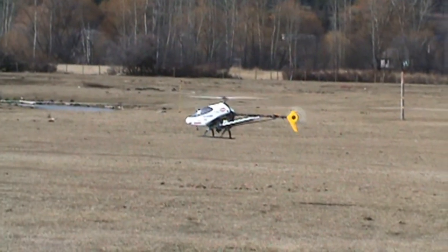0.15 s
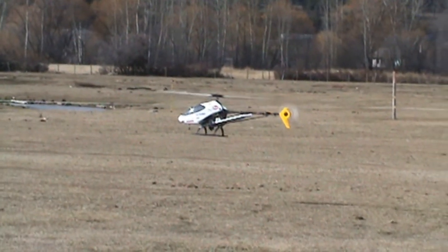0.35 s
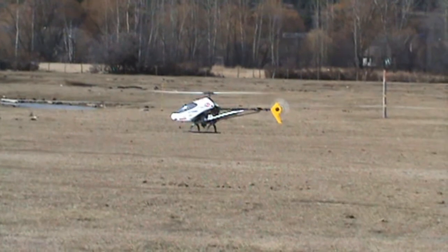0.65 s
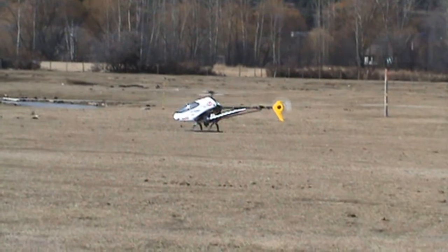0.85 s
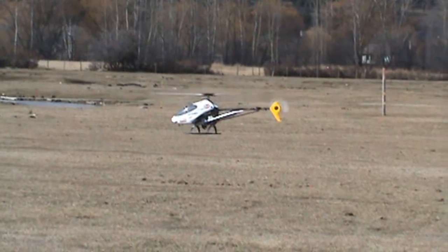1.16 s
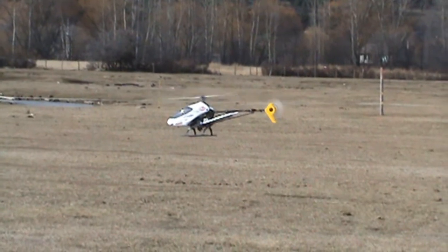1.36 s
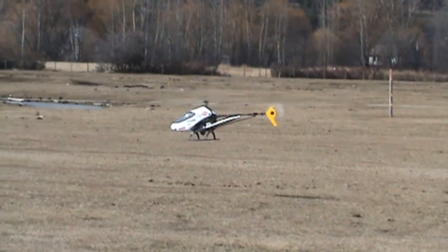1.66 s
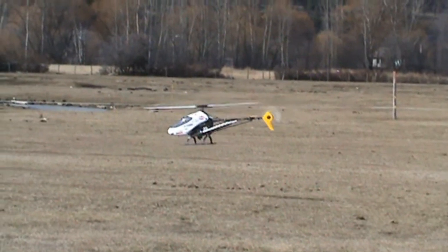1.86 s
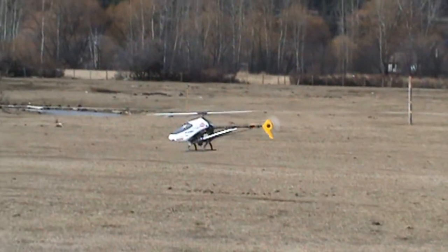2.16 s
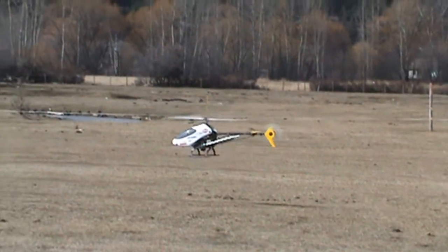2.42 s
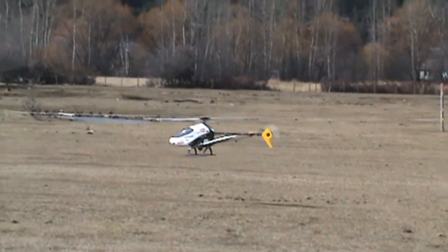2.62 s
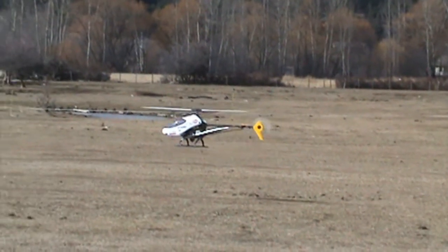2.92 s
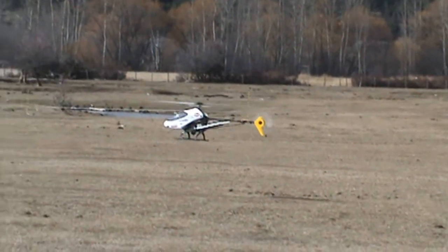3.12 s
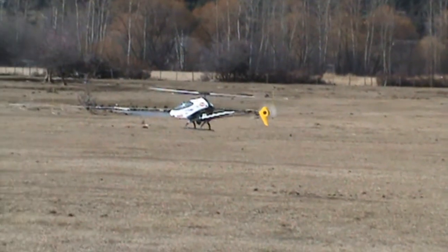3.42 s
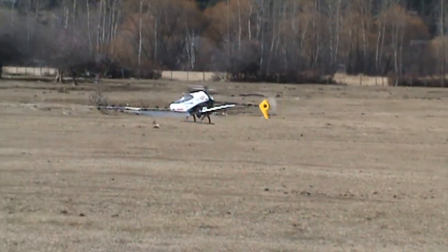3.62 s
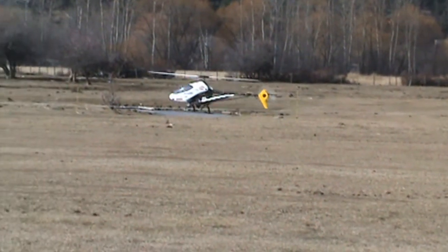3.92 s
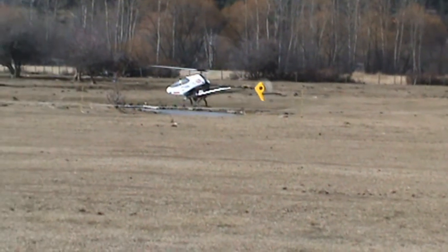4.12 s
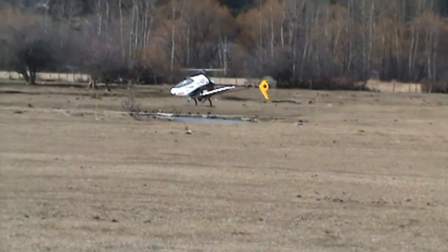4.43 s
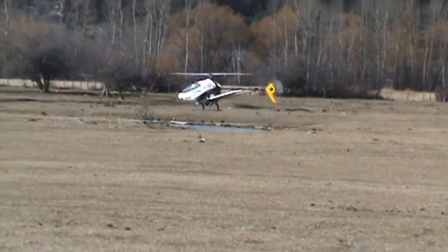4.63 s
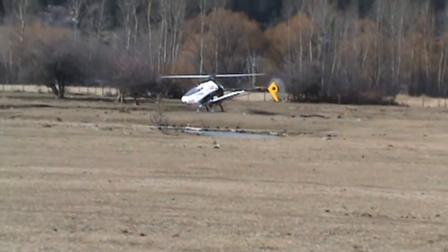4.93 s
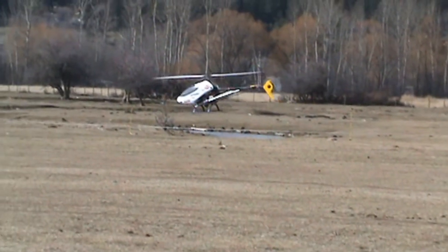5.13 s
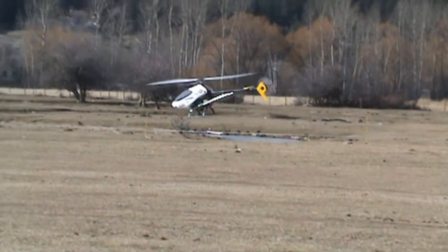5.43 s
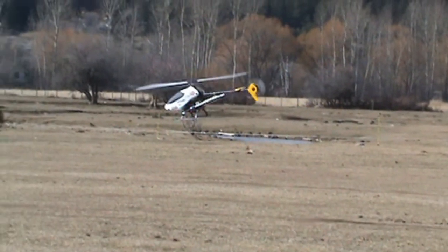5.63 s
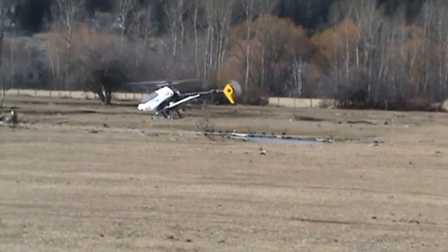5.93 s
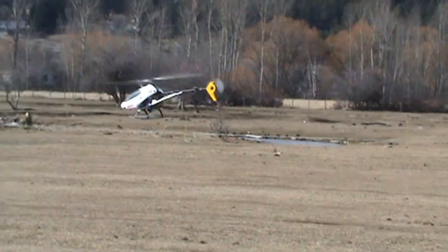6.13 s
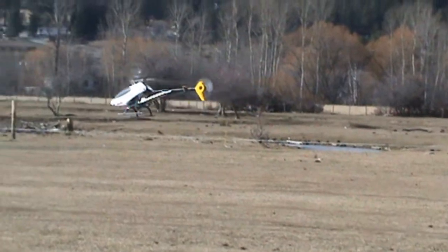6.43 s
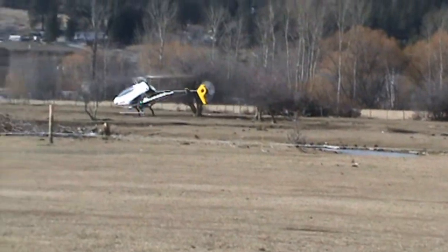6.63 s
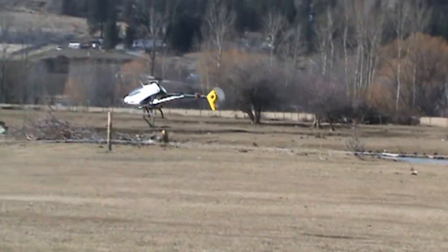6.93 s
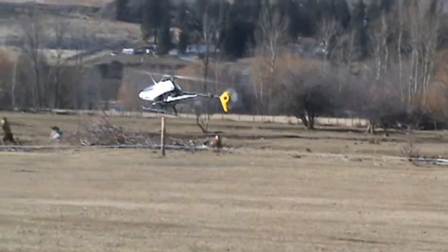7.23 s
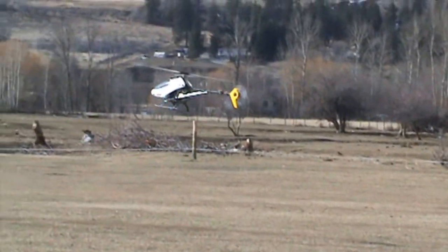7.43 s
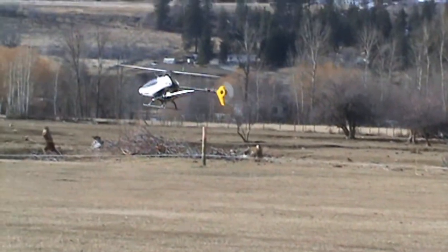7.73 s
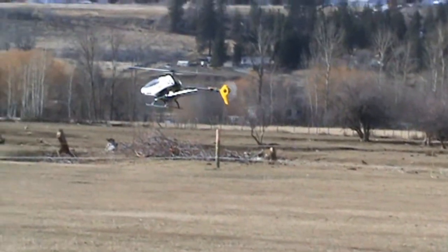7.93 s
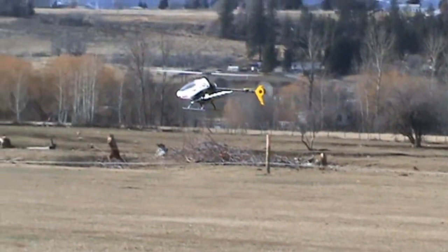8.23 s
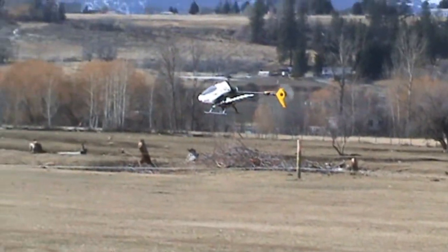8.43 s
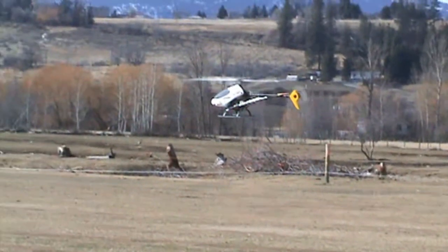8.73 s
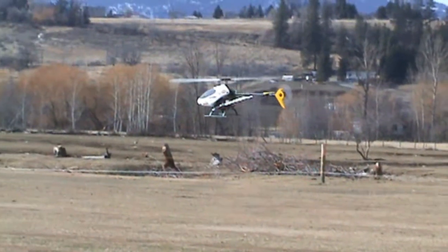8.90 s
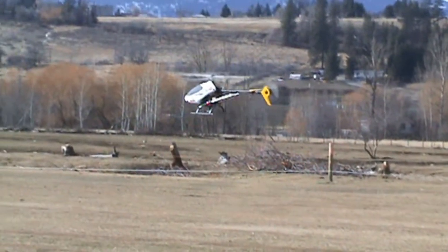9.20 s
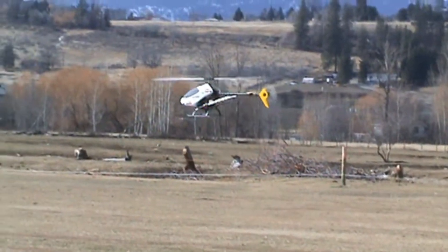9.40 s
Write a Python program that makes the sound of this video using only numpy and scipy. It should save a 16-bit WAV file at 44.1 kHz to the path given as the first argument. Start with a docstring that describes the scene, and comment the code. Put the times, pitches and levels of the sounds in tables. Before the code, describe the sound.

A model helicopter with a tiny two-stroke engine hovers about ten metres away over a grass field. Its dense, nasal buzz near 195 hertz never stops, with ringing upper harmonics, raspy exhaust noise and fine hiss. Short stumbles roughen it; pitch rises slightly midway, then settles. Blade swish and flutters stay faint beneath. A distant vehicle drones low in the middle, and light wind rumbles on the stereo microphones, the engine leaning right.

```python
"""An open field: a model helicopter with a small two-stroke engine hovers low, climbs a little and drifts sideways.
Each firing is a buzzing pulse of harmonics plus a burst of noise ringing in the muffler; at times the engine stumbles.
The harmonics slide through the muffler's resonances, and the echo off the grass comes later with height.
Sine tones and chopped noise make the rotor, with short flutters as the blades cut their own wake.
Low sine orders make a far vehicle's drone; a light wind rumbles as low noise, separate on each of two microphones."""
import sys
import numpy as np
from scipy import signal
from scipy.fft import rfft, irfft, next_fast_len
from scipy.io import wavfile
from scipy.ndimage import map_coordinates

SR = 44100
rng = np.random.default_rng(int(sys.argv[2]) if len(sys.argv) > 2 else 0)


def digitize_waveform(pressure):
    """Quantize a signal to 16-bit integers and store it at the path in sys.argv[1].

    Rows of a 2-D input are taken as channels; values are limited to [-1, 1].
    """
    field = np.atleast_2d(pressure).T
    bounded = np.clip(field, -1, 1)
    quanta = np.round(bounded * 32767).astype(np.int16)
    wavfile.write(sys.argv[1], SR, quanta)


N = 421596
TIME = np.arange(N) / SR


def from_db(db):
    """Decibels to gain."""
    return 10 ** (np.asarray(db) / 20)


def rms_one(x):
    """Scale to unit power."""
    return x / np.sqrt(np.mean(x ** 2) + 1e-20)


def in_time(rows, t=TIME):
    """The value columns of an automation table at times t."""
    s, *columns = np.transpose(rows)
    return [np.interp(t, s, c) for c in columns]


def across_drift(t=TIME):
    """Progress of the sideways drift, from -0.5 at the start to 0.5 at the end."""
    return t / TIME[-1] - .5


def swell(s, half_length):
    """A bell-shaped rise and fall around time s, down to 1/e at the half length."""
    return np.exp(-np.minimum(((TIME - s) / half_length) ** 2, 50))


def drift(rate, t=TIME):
    """Smooth random curve with `rate` random points a second; rms 1."""
    knots = rng.standard_normal(4096)
    return rms_one(map_coordinates(knots, [t * rate], order=2, mode="wrap"))


def at_hz(points, hz):
    """Read a spectrum on a log-frequency axis."""
    table = np.array(points)
    return np.interp(np.log(hz + 1e-3), np.log(table[:, 0]), table[:, 1])


def filtered(x, response):
    """Apply a response given as a function of frequency."""
    size = next_fast_len(N + 4096)
    hz = np.arange(size // 2 + 1) * SR / size
    return irfft(rfft(x, size) * response(hz), size)[..., :N]


def band(x, low_hz, high_hz):
    """One band of a sound, at unit power."""
    bandpass = signal.butter(3, [low_hz, high_hz], "band", fs=SR, output="sos")
    return rms_one(signal.sosfilt(bandpass, x))


# how wide noise spreads over the microphone pair: pitch_hz, diffuse_share [0-1]
DIFFUSE_SHARE = [(60, 0.22), (300, 0.1), (1000, 0.72), (3000, 0.091), (6000, 0.33), (11000, 0.43)]


def noise(colour):
    """Coloured noise: a shared middle of rms 1 plus a diffuse part of opposite sign in the two channels."""
    mid, side = filtered(rng.standard_normal((2, N)), lambda hz: from_db(at_hz(colour, hz)))
    side = filtered(rms_one(side), lambda hz: at_hz(DIFFUSE_SHARE, hz))
    return rms_one(mid) + side * [[1], [-1]]


# tone of the wind rumble, relative: pitch_hz, level_db
WIND_COLOUR = [(15, 1), (35, 1), (70, 11), (110, 10.5), (170, 8), (280, -24), (600, -25), (2000, -55)]
# gusts over the light breeze: centre_s, half_length_s, level_db
GUSTS = [(.55, 0.31, -38), (1.35, 0.59, -37.5), (2.0, 0.34, -33), (4.75, .12, -51), (7.4, 0.99, -41),
         (9.103, 0.56, -32.5)]
BREEZE_DB = -47.5


def wind(lumpy_db=0.5):
    """Lumpy low rumble of moving air, separate on each microphone."""
    channels = [noise(WIND_COLOUR)[0] * from_db(lumpy_db * drift(19)) for channel in range(2)]
    gusts = sum(from_db(db) * swell(s, length) for s, length, db in GUSTS)
    return np.array(channels) * (from_db(BREEZE_DB) + gusts)


# engine speed of the far vehicle: time_s, cycles_per_s
VEHICLE_SPEED = [(2.3, 16.4), (2.9, 18.5), (3.45, 19.6), (3.9, 18.6), (5.0, 19.6), (6.15, 21.0),
                 (6.6, 20.5), (7.2, 19.5), (7.5, 19.7), (7.9, 19)]
# its exhaust orders: multiple of the cycle rate, level_db relative to VEHICLE_DB
VEHICLE_ORDERS = [(4, -11), (5, 0), (8, -2.5), (11, -8), (13, -7)]
VEHICLE_DB = -40
VEHICLE_START_S, VEHICLE_ATTACK_S, VEHICLE_END_S, VEHICLE_RELEASE_S = 2.28, 0.33, 7.9, 0.65


def vehicle(waver_db=1.5):
    """Only the low exhaust orders of a far engine carry across the field, while it is under load."""
    angle = 2 * np.pi * np.cumsum(in_time(VEHICLE_SPEED)[0]) / SR
    attack = (TIME - VEHICLE_START_S) / VEHICLE_ATTACK_S
    release = (VEHICLE_END_S - TIME) / VEHICLE_RELEASE_S
    load = np.clip(np.minimum(attack, release), 0, 1)
    drone = 0
    for k, db in VEHICLE_ORDERS:
        drone = drone + from_db(VEHICLE_DB + db + waver_db * drift(9.3)) * np.sin(k * angle)
    return np.sqrt(2) * load * drone


# engine speed of the helicopter: time_s, firings_per_s
SPEED = [(0.0, 193.5), (.15, 193.6), (.47, 194.8), (.68, 194.1), (.82, 194.3), (.95, 193.7), (1.2, 193.7),
         (1.35, 194.7), (1.5, 194.3), (1.63, 193.0), (1.95, 192.4), (2.17, 192.9), (2.45, 192.0),
         (2.92, 195.3), (3.3, 195.5), (3.5, 194.9), (3.75, 195.8), (4.3, 198.7), (4.55, 200.5),
         (5.0, 201.7), (5.35, 203.4), (5.52, 203.0), (5.85, 198.4), (6.15, 196.3), (6.55, 196.9),
         (7.25, 196.7), (7.5, 195.6), (7.65, 195.5), (7.84, 194.0), (8.23, 196.2), (8.43, 195.9),
         (8.85, 198.1), (9.05, 198.1), (9.27, 196.4), (9.56, 197.0)]
ROTOR_RATIO = .1465   # rotor turns per firing


def crank_angle():
    """The crank's angle, swayed by the rotor's load and by uneven combustion, and the rotor's steadier angle."""
    angle = 2 * np.pi * np.cumsum(in_time(SPEED)[0]) / SR
    rotor = ROTOR_RATIO * angle
    load_sway = .019 * np.sin(rotor) + .013 * np.sin(rotor / 2 + drift(4))
    combustion_sway = .007 * drift(170)
    return angle + load_sway + combustion_sway, rotor


# rotor and drive tones: multiple of the firing rate, level_db [rms], gain_db over the sideways drift
DRIVE_TONES = [(0.2945, -48, 3), (.589, -45.5, 6), (0.879, -52, 8), (1.139, -53, 2), (1.3, -52, 0),
               (2.532, -47, 5)]
# tone of the air off the blades, relative: pitch_hz, level_db
SWISH_COLOUR = [(50, -18), (100, -3), (170, 2), (260, 4.5), (380, -6.5), (650, -8.5), (1100, -0.5),
                (1800, -12), (2200, -2.5), (2800, 1.5), (5000, -25)]
# moments when the blades cut their own wake: centre_s, half_length_s, level_db
FLUTTERS = [(0.3, 0.038, -36), (1.037, 0.05, -35), (1.798, 0.039, -35), (2.3, 0.035, -40),
            (3.54, 0.025, -32), (4.227, 0.044, -42), (4.61, 0.057, -33), (4.993, 0.082, -35),
            (5.703, 0.062, -32)]
# tone of those flutters, relative: pitch_hz, level_db
FLUTTER_COLOUR = [(300, -25), (480, 7.5), (680, 18.5), (800, -10), (1100, -43)]


def rotors(rotor, swish_db=-34.0, chop=0.3, waver_db=3.0):
    """Tones of the blades and gears, air chopped twice a turn, and short flutters in the wake."""
    tones = 0
    for multiple, level, turn_db in DRIVE_TONES:
        phase = multiple * rotor / ROTOR_RATIO + .3 * drift(5)
        level_db = level + turn_db * across_drift() + waver_db * drift(1.77)
        tones = tones + np.sqrt(2) * from_db(level_db) * np.sin(phase)
    swish = from_db(swish_db) * noise(SWISH_COLOUR) * (1 + chop * np.cos(2 * rotor))
    flutter_level = sum(from_db(level) * swell(s, length) for s, length, level in FLUTTERS)
    flutter = flutter_level * noise(FLUTTER_COLOUR) * (1 + 0.18 * np.cos(2 * rotor))
    return tones + swish + flutter


# the flight: time_s, height_m above the grass
HEIGHT = [(0, 0.46), (.85, 0.48), (1.5, 0.4), (2.55, 0.31), (3.2, 0.35), (3.9, 0.49), (4.6, 0.6),
          (5.1, 0.72), (5.55, 0.724), (5.95, 0.67), (6.6, 0.746), (7.3, 0.74), (8.1, 0.91), (9.2, 0.93),
          (9.56, 0.96)]
DISTANCE_M, MIC_HEIGHT_M, SOUND_M_PER_S = 10, 1.7, 343
GRASS_PHASE_RAD = 1.87   # phase turn of the grazing bounce


def echo_lag(t):
    """Seconds by which the bounce off the grass trails the direct sound, growing with height."""
    return 2 * MIC_HEIGHT_M * in_time(HEIGHT, t)[0] / DISTANCE_M / SOUND_M_PER_S


def ground_echo(x, strength=0.21):
    """A reflection off the grass, later with height, sweeps a shallow comb through the treble."""
    bounced = filtered(x, lambda hz: np.exp(-1j * GRASS_PHASE_RAD))
    read_at = (TIME - echo_lag(TIME)) * SR
    echo = np.array([map_coordinates(channel, [read_at], order=3, mode="nearest") for channel in bounced])
    return (x + strength * echo) / np.hypot(1, strength)


# tone of the exhaust jet, relative: pitch_hz, level_db
HISS_COLOUR = [(4500, -1), (6400, -3.5), (7600, -6), (8500, -7.5), (10500, -8.5), (11500, -16.5),
               (12500, -44)]
# the hiss flares and sinks: centre_s, half_length_s, gain_db
HISS_FLARES = [(0.704, 0.13, 2), (.97, .09, -2), (1.298, 0.1, 4.5), (1.55, .08, -0.5), (2.404, 0.062, 3.5),
               (2.95, 0.19, 2), (3.2, 0.093, -0.5), (3.614, .12, -1), (3.898, 0.16, 2), (4.237, 0.077, 3.5),
               (4.921, 0.12, 2.5), (5.3, .12, -1), (6.95, 0.1, -1), (7.24, .06, 2), (7.574, 0.047, 1.5),
               (9.33, 0.073, 1.5)]
HISS_ORDERS = range(33, 52)   # harmonics of the firing rate
HISS_DB, HISS_DB_PER_S = -30, 0.0652   # level at the start; its slow rise
# a narrow whistle in the jet, heard until the helicopter turns away
WHISTLE_HZ, WHISTLE_WIDTH_HZ, WHISTLE_DB, WHISTLE_END_S, WHISTLE_FADE_S = 8520, 130, -49.5, 5.6, 0.75


def whistle(flares_db):
    """Noise through one narrow resonance, flaring twice as deep in dB as the hiss."""
    tone = rms_one(filtered(rng.standard_normal(N),
                            lambda hz: 1 / (1 + (2 * (hz - WHISTLE_HZ) / WHISTLE_WIDTH_HZ) ** 2)))
    fade = np.clip((WHISTLE_END_S - TIME) / WHISTLE_FADE_S, 0, 1)
    return tone * from_db(WHISTLE_DB + 2 * flares_db) * fade


def hiss(angle, rotor, buzz_db=-4.0, buzz_db_per_m=-11, burst=0.027, waver_db=1.0, throb=0.071):
    """Fine jet noise with a faint whistle and the last harmonics flickering in it, clearest while flying low."""
    t = TIME[::200]   # slow control rate
    buzz = 0
    for k in HISS_ORDERS:
        wander = 2 * drift(2, t) + .5 * drift(50, t)
        fading = from_db(2.5 * drift(5, t)) * np.exp(1j * wander)
        buzz = buzz + (np.interp(TIME, t, fading) * np.exp(1j * k * angle)).real / k ** 2
    buzz = from_db(buzz_db + buzz_db_per_m * in_time(HEIGHT)[0]) * rms_one(buzz)
    jet = noise(HISS_COLOUR) * (1 + burst * np.cos(angle - .9))
    flares_db = sum(db * swell(s, length) for s, length, db in HISS_FLARES)
    level = from_db(HISS_DB + HISS_DB_PER_S * TIME + flares_db + waver_db * drift(13))
    return (whistle(flares_db) + level * (jet + buzz)) * (1 + throb * np.sin(rotor))


def per_firing(angle):
    """A fresh chance value for each firing, held while it rings; spread 1."""
    firing = ((angle + 1.3) // (2 * np.pi)).astype(int)
    return rng.standard_normal(4096)[firing]


# engine stumbles: centre_s, half_length_s, contrast of alternate firings [0-1], raggedness of timing [0-1]
STUMBLES = [(.82, .025, .05, .45), (1.09, .015, 0, .3), (1.58, .05, .18, .4), (2.365, .055, .6, .85),
            (3.48, .1, .15, .3), (5.77, .055, .5, .4), (6.95, .33, .2, .1), (7.37, .045, .35, .6),
            (7.67, .015, .3, .6), (7.745, .04, .55, .7), (9.16, .035, .65, .4), (9.3, .3, .03, .25)]


def stumbles(angle):
    """Alternate firings turn weaker and stronger, and the engine runs ragged, around each stumble."""
    weak = sum(depth * swell(s, length) for s, length, depth, _ in STUMBLES) * np.cos((angle - .9) / 2)
    ragged = sum(amount * swell(s, length) for s, length, _, amount in STUMBLES)
    return weak, ragged


# tone of the gas noise, relative: pitch_hz, level_db
RASP_COLOUR = [(1250, -11), (1600, 28), (1850, -37), (2100, 14), (2350, -7), (2750, 13), (3050, -16),
               (3250, 7), (3550, 0.5), (4100, -17), (4700, -14), (5250, -1.5), (5750, -6), (6200, -18),
               (7000, -26)]
# treble in the muffler's three ringing zones, before each layer's trim: time_s, low_db, middle_db, high_db
RINGING = [(0.0, -29, -25.5, -31), (0.45, -29.5, -25.5, -30.5), (0.56, -27, -28, -28.5),
           (1.06, -29.5, -26.5, -31), (1.97, -28.5, -30, -28.5), (2.05, -26, -31, -23.5),
           (2.34, -26, -30.5, -30), (2.53, -20, -30, -34.5), (2.61, -21, -32, -33), (2.98, -28, -32, -29.5),
           (3.14, -25, -31, -27.5), (3.19, -26.5, -34.5, -25.5), (3.41, -35, -28.5, -30),
           (3.54, -30, -28, -33.5), (4.13, -24.5, -33, -27), (4.66, -22, -37, -32),
           (5.03, -25.5, -28.5, -28.5), (5.7, -26.5, -29.5, -28.5), (5.72, -28, -32, -33.5),
           (5.91, -23.5, -29, -26), (6.07, -25, -31, -30.5), (6.28, -24, -28.5, -26.5),
           (6.47, -29, -28.5, -30), (7.03, -27, -27.5, -32), (7.35, -26.5, -24, -32.5),
           (7.51, -28, -28, -33), (7.75, -25, -23.5, -31.5), (8.15, -24.5, -28.5, -28),
           (8.71, -25.5, -27.5, -26), (8.84, -25, -28, -29.5), (9.35, -22, -25.5, -29.5),
           (9.56, -27, -26.5, -31)]
# borders of the three zones: edge_hz
ZONE_EDGES_HZ = [2250, 3250, 4450, 6400]
# trim of the gas noise on the ringing level, low to high zone: trim_db
RASP_TRIM_DB = (-13.0, -10.5, -7.0)
# how tightly the noise bunches at the firing, low to high zone: exponent [no unit]
RASP_BURST = (1.0, 1.1, 1.35)
# gas noise in the pipe: band, level, change over the sideways drift
PIPE_RASP_HZ, PIPE_RASP_DB, PIPE_RASP_TURN_DB = (1180, 1700), -44.5, -15.5


def rasp(angle, weak, ragged, follows=0.99, turn_db=(0.5, 5.0, 1.0), stumble_db=(2.5, 3.0, .3)):
    """Gas bursts out with each firing and rings in pipe and muffler; shorter in the top, harsher in a stumble."""
    crest = np.cos(angle - .9)
    strength = np.exp(.12 * per_firing(angle)) * (1 + weak)
    gas, side = noise(RASP_COLOUR), across_drift()
    pipe_level = from_db(PIPE_RASP_DB + PIPE_RASP_TURN_DB * side)
    out = band(gas, *PIPE_RASP_HZ) * pipe_level * rms_one(np.exp(crest))
    zones = zip(ZONE_EDGES_HZ, ZONE_EDGES_HZ[1:], in_time(RINGING), RASP_TRIM_DB, RASP_BURST, turn_db, stumble_db)
    for low, high, level, trim, burst, turn, boost in zones:
        level = level.mean() + follows * (level - level.mean())
        level = level + trim + turn * side + boost * ragged
        out = out + band(gas, low, high) * from_db(level) * rms_one(np.exp(burst * crest))
    return out * strength


# resonances of pipe and muffler, relative in the ringing zones:
# centre_hz, width_hz, level_db, gain_db over the sideways drift as the muffler shows another side
MUFFLER = [(380, 230, -41, -16.5), (571, 102, -33, 4), (786, 20, -39.5, 9), (1025.6, 182, -22.5, -2),
           (1296, 112, -29, 7), (1599.5, 88, -29.5, -18.5), (2042, 122, -36, -8.5), (2265, 270, -41, 16.5),
           (2580, 112, -23.5, -27), (2904, 116, -23.5, -8.5), (3126, 103, -27.5, -10.5),
           (3486, 118, -25, 5.5), (3766, 280, -30.5, -5), (4253, 310, -39, 3), (4703, 130, -35.5, -3),
           (5270, 410, -34.5, 11), (5760, 220, -39.5, 16), (6040, 74, -45, 3)]


def muffler(hz, t):
    """Resonances of pipe and muffler toward the listener, who sees them from a slowly changing side."""
    power = 0
    for centre, width, db, turn_db in MUFFLER:
        peak = from_db(db + turn_db * across_drift(t))
        power = power + (peak / (1 + (2 * (hz - centre) / width) ** 2)) ** 2
    return np.sqrt(power)


# the echo's comb on the harmonics: pitch_hz, depth [0-1]
GRASS_COMB = [(500, 0.1), (750, 0.18), (2000, 0.38), (5000, 0.35)]
# single harmonics sing out or fade, before the zones are levelled:
# centre_s, half_length_s, multiple of the firing rate, gain_db
SWELLS = [(.4, .5, 16, 4), (.4, .4, 20, 2), (.7, .25, 29, 5), (.55, .45, 12, -12), (1.3, .5, 24, -5),
          (1.4, .25, 13, -3), (1.5, .35, 4, -4), (1.55, .45, 26, 8), (1.7, .4, 14, -5), (1.75, .3, 21, 2),
          (2.0, .35, 19, 4), (2.12, .14, 28, 7), (2.2, .3, 13, 3), (2.2, 1.2, 2, 2), (2.4, .4, 6, -3),
          (2.45, .6, 3, 4), (2.5, .6, 8, 4), (2.7, .3, 16, 4), (2.85, .2, 19, 5), (3.1, .12, 15, 3),
          (3.15, .3, 18, -6), (3.25, .22, 13, 6), (3.3, .3, 24, 4), (3.25, .15, 26, 7), (3.4, .5, 10, 4),
          (3.5, .4, 6, 3), (3.7, .7, 21, 5), (3.8, .35, 16, -4), (3.9, .3, 19, 3), (3.85, .3, 14, 8),
          (4.8, .6, 14, 4), (5.0, .5, 15, 3), (4.0, .35, 3, -3), (4.2, .45, 12, 7), (4.25, .45, 9, -8),
          (4.3, .3, 26, 5), (4.45, .17, 17, 7), (4.5, .3, 18, -9), (4.6, .12, 19, -5), (4.8, .13, 17, -9),
          (5.1, .25, 16, -6), (5.15, .35, 8, 4), (5.25, .25, 19, 4), (5.45, .35, 24, 8), (5.8, 1.5, 9, -5),
          (6.0, .12, 2, -5), (6.05, .25, 14, 5), (6.1, .25, 15, 4), (6.0, .25, 16, -9), (6.15, .3, 8, 6),
          (6.5, .4, 11, 5), (6.9, .5, 2, 4), (6.9, .5, 10, -7), (7.1, .35, 12, 5), (7.2, .5, 14, -4),
          (7.3, .2, 21, -6), (8.1, .8, 12, 5), (8.4, .5, 16, 4), (8.7, .6, 28, 6), (8.8, .5, 17, -5),
          (9.2, .25, 18, -9), (9.25, .35, 24, 8), (9.3, .3, 12, -5), (9.4, .3, 2, -7), (9.4, .5, 10, 4),
          (9.5, .3, 20, 5)]
# level of the firing tone: time_s, level_db [rms]
FIRING_LEVEL = [(0.0, -25.5), (0.02, -27), (1.3, -25), (1.36, -28), (1.89, -24.5), (2.47, -25.5),
                (2.69, -23), (3.89, -26.5), (4.39, -24.5), (5.7, -26), (5.75, -27.5), (5.86, -26),
                (6.23, -24.5), (6.79, -26.5), (7.37, -26), (9.27, -24.5), (9.43, -26.5), (9.56, -24)]
EXHAUST_ORDERS = range(1, 33)   # harmonics of the firing rate


def harmonic_levels(t, low_follows=0.77, ring_db=(-0.6, -0.7, -2.5)):
    """Mean pitch, gain and phase of each exhaust harmonic, shaped by the muffler and the bounce off the grass."""
    orders = np.array(EXHAUST_ORDERS)
    pitch = orders[:, None] * in_time(SPEED, t)[0]
    hz = pitch.mean(axis=1)
    bounce_phase = 2 * np.pi * pitch * echo_lag(t) + GRASS_PHASE_RAD
    bounce = at_hz(GRASS_COMB, pitch) * np.exp(-1j * bounce_phase)
    gains = muffler(pitch, t) * abs(1 + bounce)
    for s, length, multiple, db in SWELLS:
        gains[multiple - 1] *= from_db(db * np.interp(t, TIME, swell(s, length)))
    # the low harmonics partly follow the firing tone
    firing, = in_time(FIRING_LEVEL, t)
    gains[hz < ZONE_EDGES_HZ[0]] *= from_db(low_follows * (firing - firing.mean()))
    gains[0] = from_db(firing)
    # each ringing zone is levelled as a whole
    for low, high, level, trim_db in zip(ZONE_EDGES_HZ, ZONE_EDGES_HZ[1:], in_time(RINGING, t), ring_db):
        zone = (hz >= low) & (hz < high)
        gains[zone] *= from_db(level + trim_db) / np.linalg.norm(gains[zone], axis=0)
    # a pulse that strikes first and rings afterwards has minimum phase
    shape = np.log(gains)
    mirrored = np.vstack([shape[-1], shape, shape[-2::-1]])
    return hz, gains, -signal.hilbert(mirrored, axis=0).imag[orders]


PUSH_LAG_S, PUSH_SPREAD = .0006, .35   # the push trails the crack; its share of the muffler's dispersion
ROUGHNESS = .15   # how much one firing's ring differs from the next, before scaling with pitch
STUMBLE_LATE_RAD, STUMBLE_RING_DB = 0.18, -2   # timing scatter in crank angle and softer ring, at full raggedness


def exhaust(angle, rotor, weak, ragged, scatter=0.17, uneven=0.012, stumble_rough=0.044, gusty=0.085, throb=0.017):
    """One pressure pulse per firing as a stack of harmonics: a low body and a ringing top."""
    t = TIME[::50]   # control rate
    roughness = ROUGHNESS + stumble_rough * np.interp(t, TIME, ragged)
    late = np.interp(t, TIME, STUMBLE_LATE_RAD * ragged * per_firing(angle))
    blades = np.interp(t, TIME, np.sin(rotor))
    body, ring = 0, 0
    turn, harmonic = np.exp(1j * angle), np.sqrt(2)
    for k, hz, gain, phase in zip(EXHAUST_ORDERS, *harmonic_levels(t)):
        height = min(hz / 3000, 1.6)   # place in the spectrum
        # reflections off the frame smear the middle of the pulse; its top stays sharper
        smear = np.interp(hz, [0, 1500, 2700, 3500], [0, .9, .9, .4])
        # the low tones leave the pipe together as one push, just after the crack
        if hz < ZONE_EDGES_HZ[0]:
            phase = PUSH_SPREAD * phase - 2 * np.pi * hz * PUSH_LAG_S
        # a ragged firing rings early or late as a whole
        phase = phase + smear * drift(0.793, t) - k * late * min(height, 1)
        gain = gain * np.exp(1j * phase)
        # moving air makes each harmonic fade in and out; the top throbs with the rotor
        air = scatter * height * (drift(5, t) + 1j * drift(5, t))
        flicker = gusty * drift(40, t) * (hz > 300)
        gain = gain * (1 + air + flicker + throb * height ** 2 * blades)
        # no two firings ring alike, least of all in a stumble
        spread = roughness * height * min(height / .85, 1)
        chance = drift(150, t) + 1j * drift(150, t)
        gain = gain * (1 + spread * chance) / np.sqrt(1 + spread ** 2)
        harmonic = harmonic * turn
        tone = (np.interp(TIME, t, gain) * harmonic).real
        if hz < ZONE_EDGES_HZ[0]:
            body = body + tone
        else:
            ring = ring + tone
    ring = ring * (1 + weak + uneven * per_firing(angle)) * from_db(STUMBLE_RING_DB * ragged)
    return body * (1 + 0.5 * weak) + ring


# level between the microphones: pitch_hz, left_minus_right_db
PAIR_BALANCE = [(60, 0), (110, -4.5), (200, -4.5), (400, -7), (650, -6.5), (1100, -5), (1600, -1.5),
                (2800, -1.9), (3900, -2), (7000, -1.8), (12000, -0.5)]
# phase between the microphones: pitch_hz, left_lag_rad
PAIR_LAG = [(60, 1.74), (200, 1.37), (400, 1.4), (600, 0.97), (1000, 0.28), (2000, 0.13), (3200, 0.37),
            (7000, 0.0065)]


def microphone_pair(x):
    """The right microphone hears the sources louder and, mostly in the bass, earlier."""
    def response(hz):
        """Left and right gains that leave the magnitude of their mean at 1."""
        half = from_db(at_hz(PAIR_BALANCE, hz) / 2) * np.exp(-.5j * at_hz(PAIR_LAG, hz))
        return np.array([half, 1 / half]) / abs((half + 1 / half) / 2)
    return filtered(x, response)


def scene():
    """The engine's treble throbs once per rotor turn; rotor, far vehicle and wind lie beneath."""
    angle, rotor = crank_angle()
    weak, ragged = stumbles(angle)
    background = rotors(rotor) + vehicle()
    treble = ground_echo(rasp(angle, weak, ragged) + hiss(angle, rotor))
    treble = treble * (1 + 0.032 * np.sin(rotor))
    engine = exhaust(angle, rotor, weak, ragged) + treble
    return microphone_pair(engine + background) + wind()


CUTOFF_HZ = 12500


def record(dry):
    """The highest peaks are rounded and the top is cut steeply."""
    rounded = dry / (1 + (dry / .95) ** 6) ** (1 / 6)
    return signal.sosfilt(signal.ellip(10, .1, 90, CUTOFF_HZ, fs=SR, output="sos"), rounded)


dry = scene()
out = record(dry)
digitize_waveform(out)
```